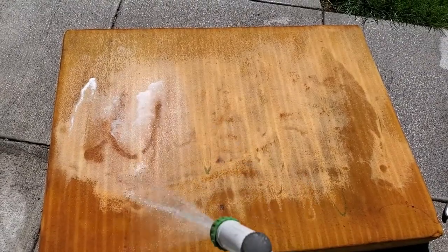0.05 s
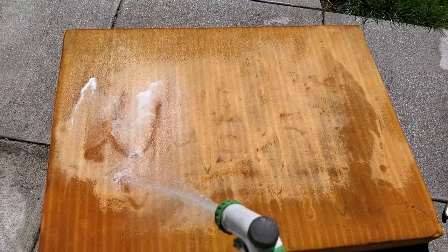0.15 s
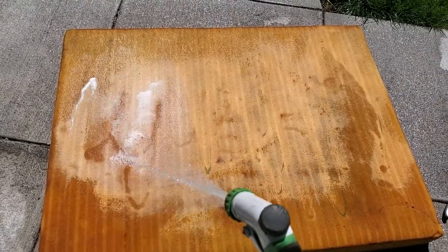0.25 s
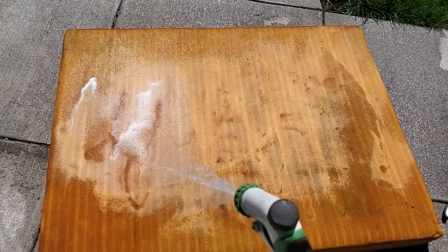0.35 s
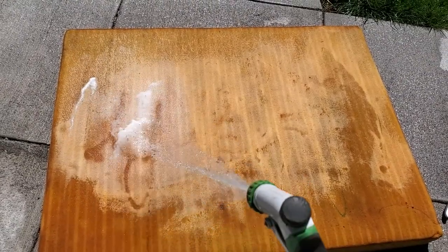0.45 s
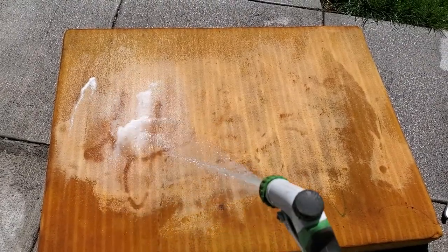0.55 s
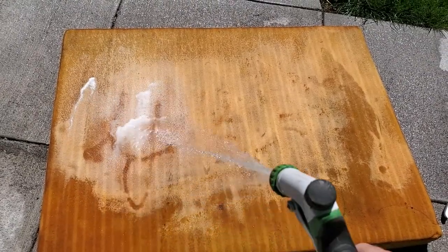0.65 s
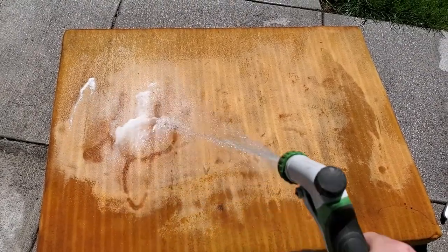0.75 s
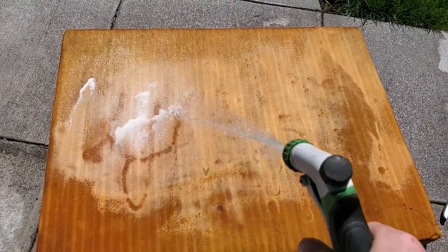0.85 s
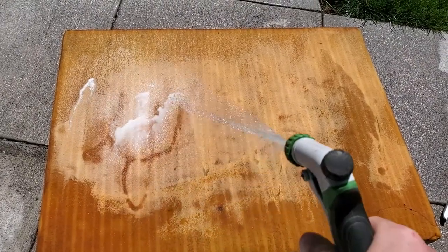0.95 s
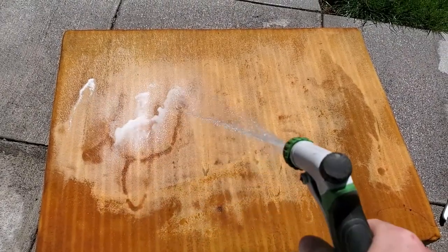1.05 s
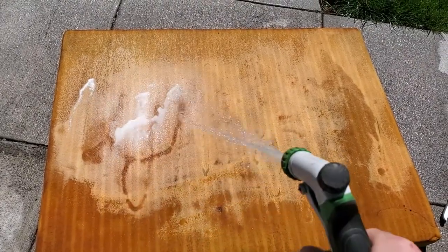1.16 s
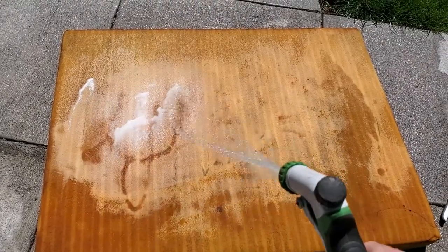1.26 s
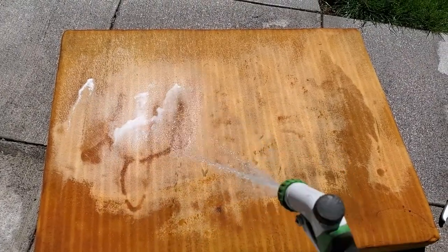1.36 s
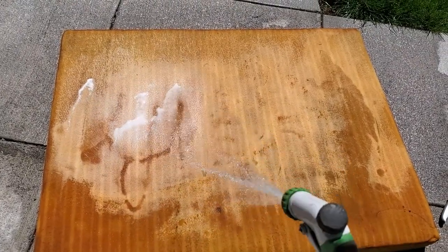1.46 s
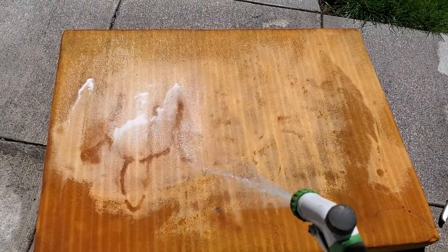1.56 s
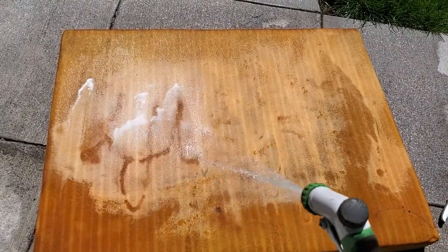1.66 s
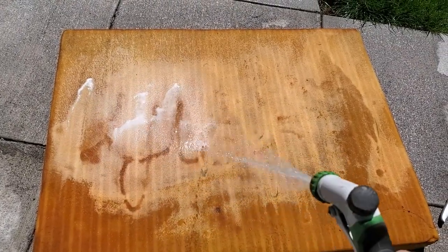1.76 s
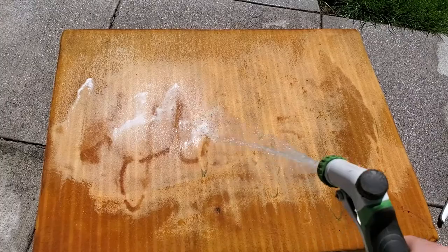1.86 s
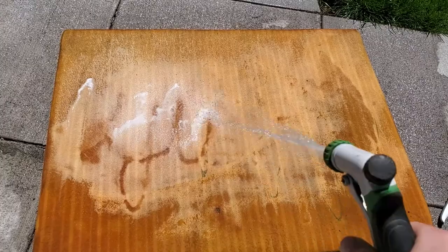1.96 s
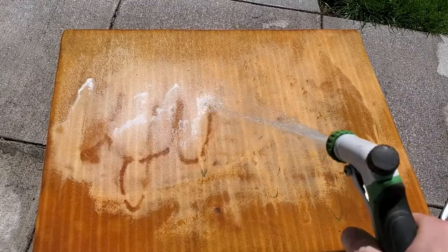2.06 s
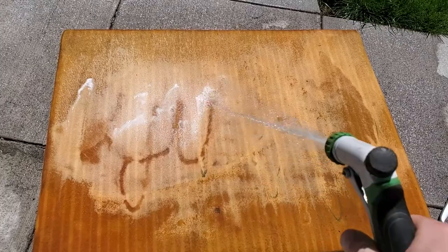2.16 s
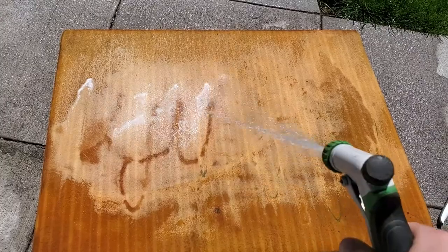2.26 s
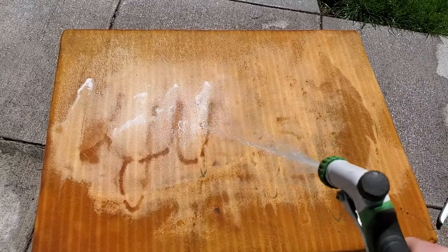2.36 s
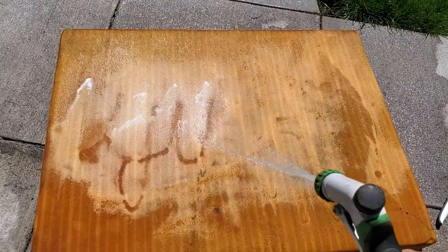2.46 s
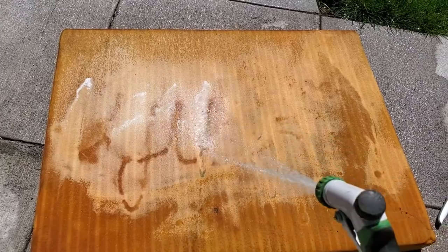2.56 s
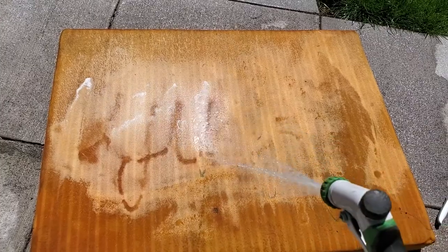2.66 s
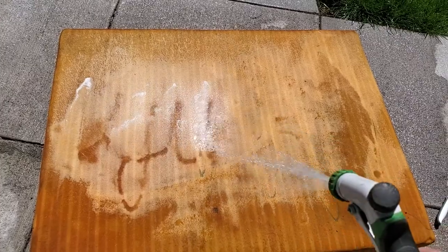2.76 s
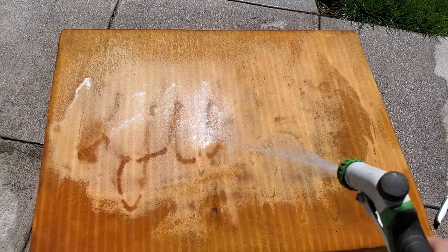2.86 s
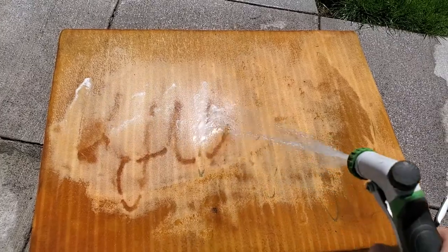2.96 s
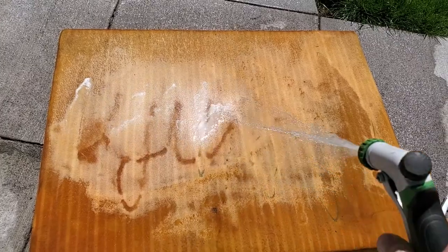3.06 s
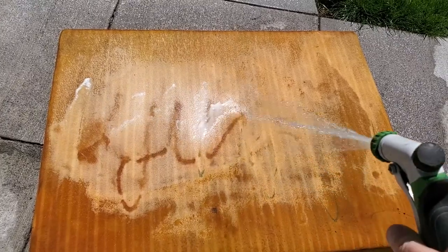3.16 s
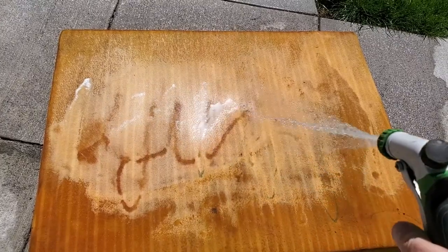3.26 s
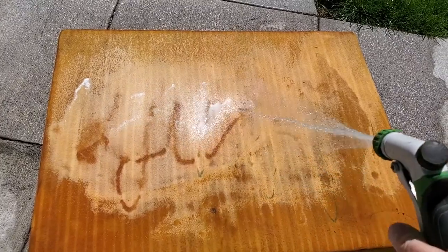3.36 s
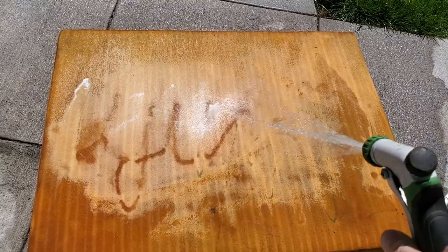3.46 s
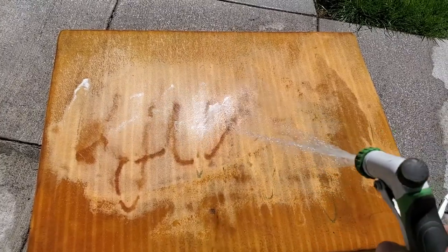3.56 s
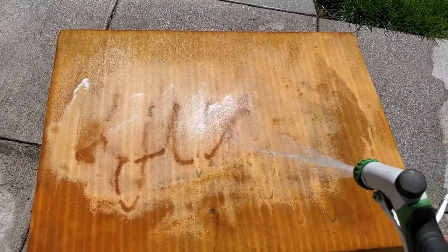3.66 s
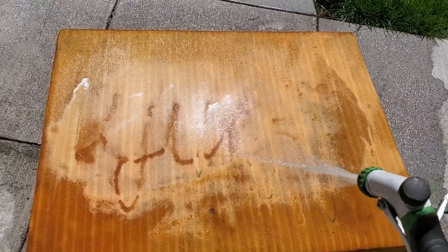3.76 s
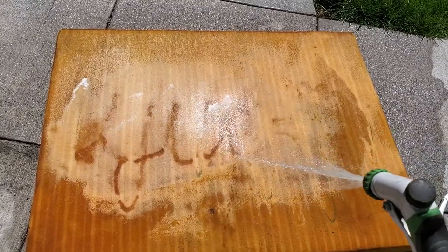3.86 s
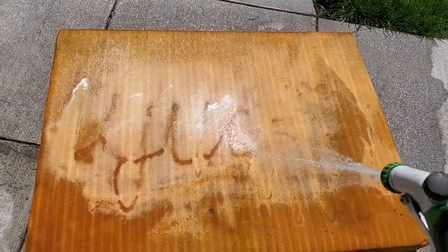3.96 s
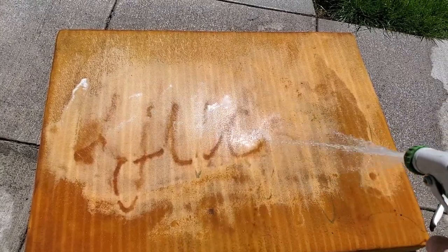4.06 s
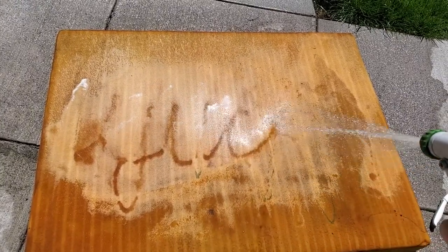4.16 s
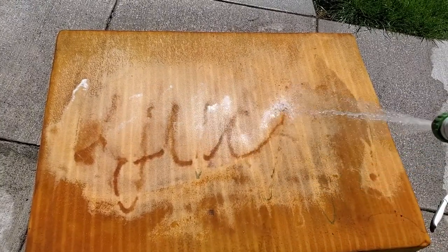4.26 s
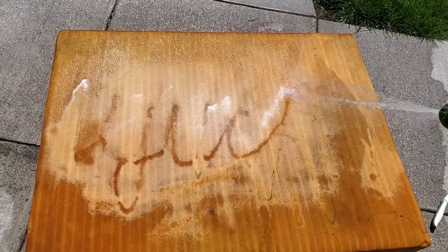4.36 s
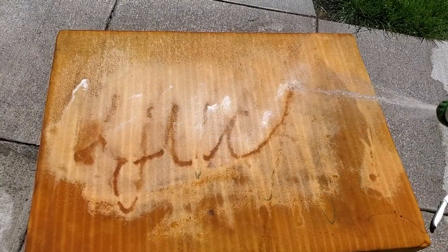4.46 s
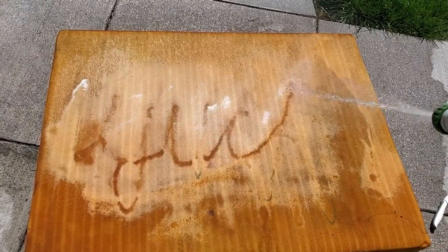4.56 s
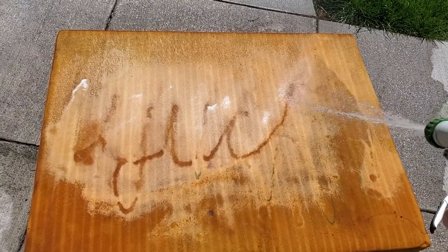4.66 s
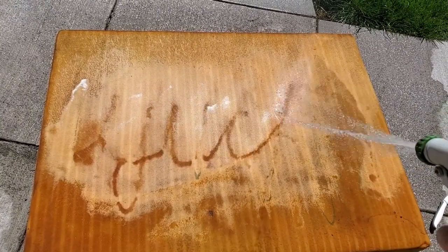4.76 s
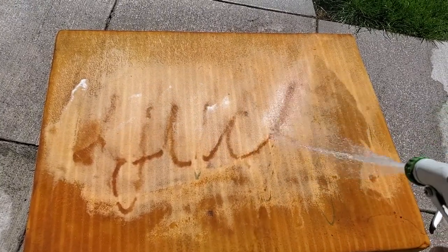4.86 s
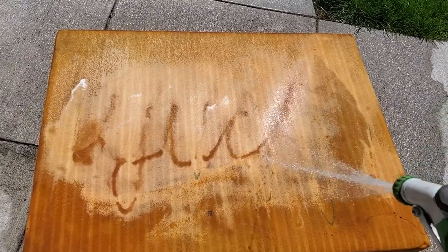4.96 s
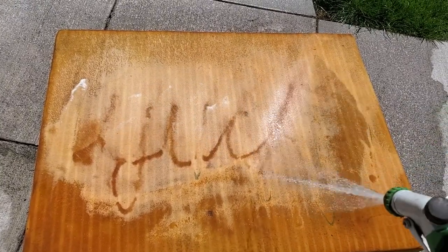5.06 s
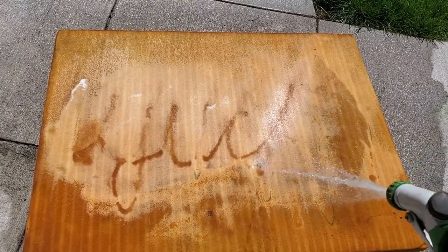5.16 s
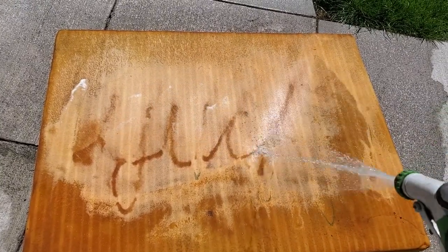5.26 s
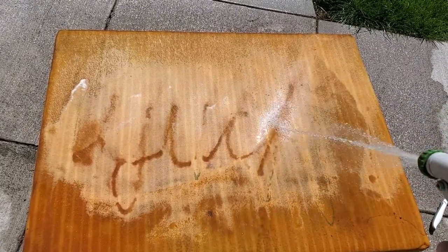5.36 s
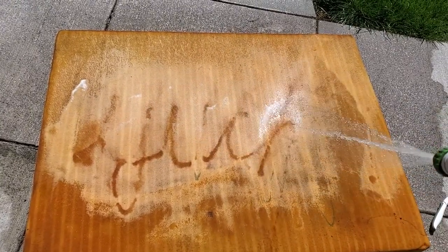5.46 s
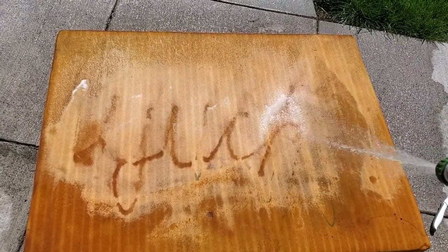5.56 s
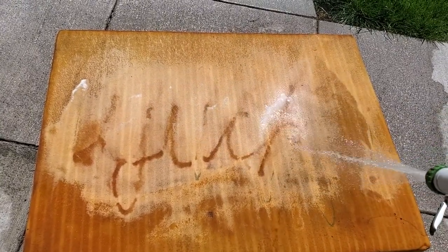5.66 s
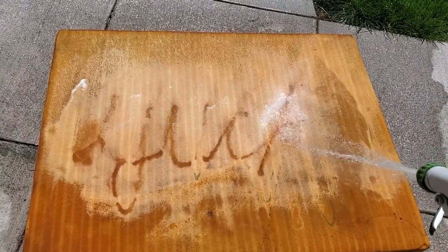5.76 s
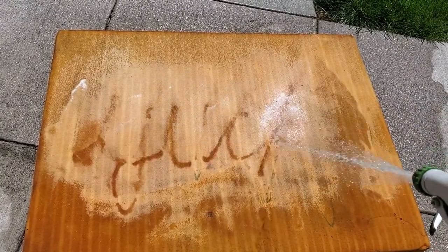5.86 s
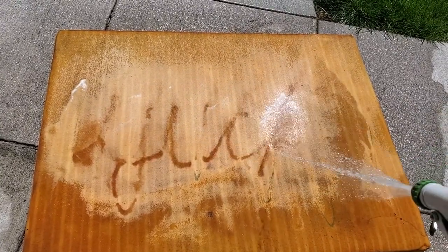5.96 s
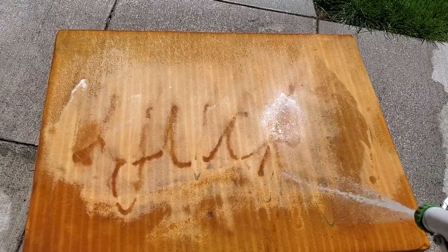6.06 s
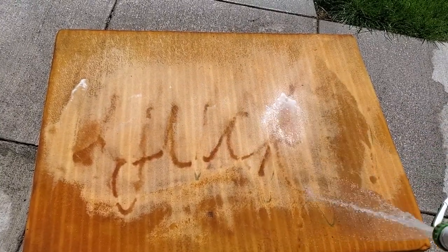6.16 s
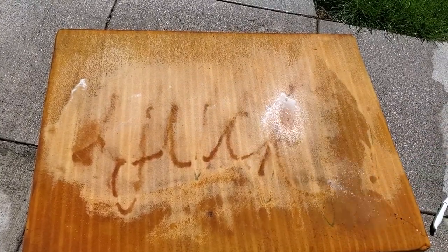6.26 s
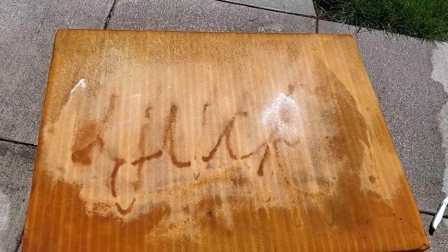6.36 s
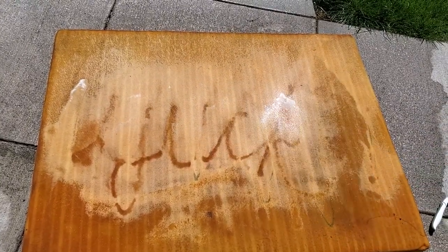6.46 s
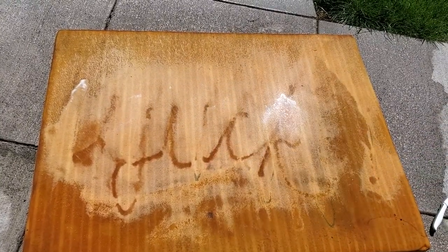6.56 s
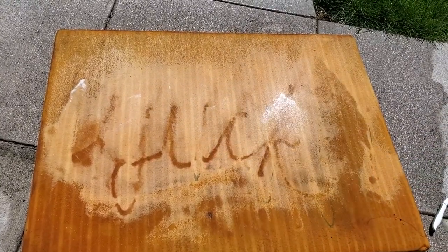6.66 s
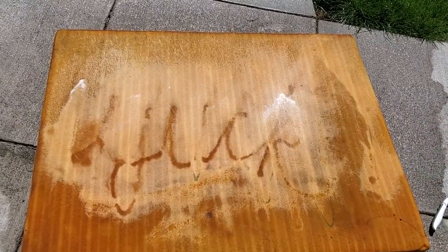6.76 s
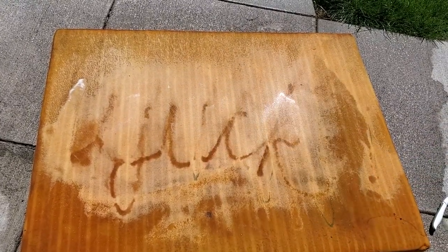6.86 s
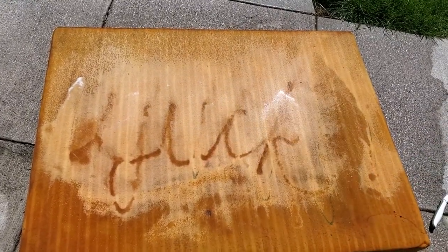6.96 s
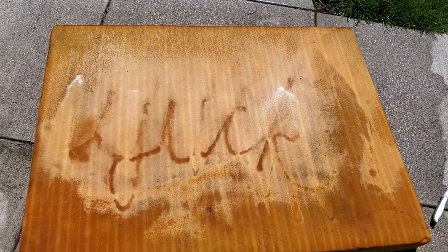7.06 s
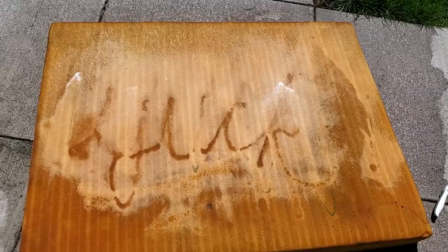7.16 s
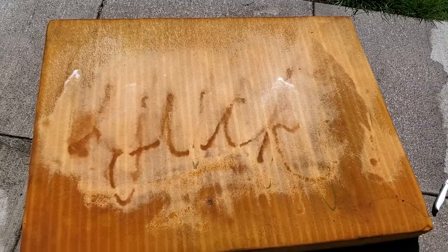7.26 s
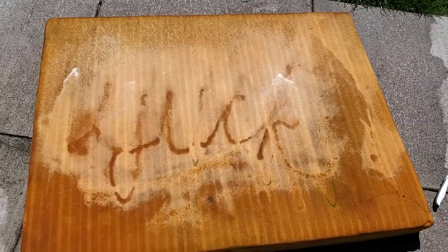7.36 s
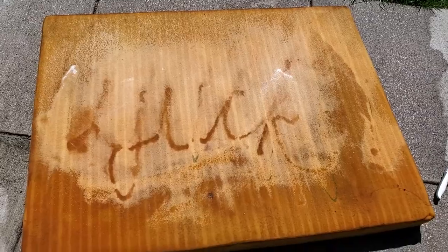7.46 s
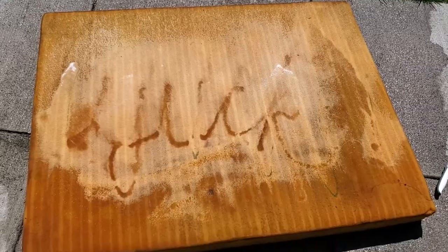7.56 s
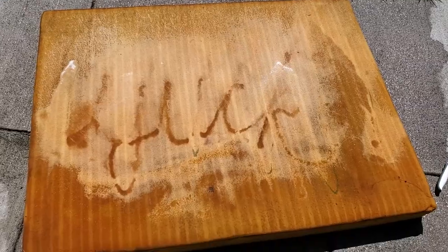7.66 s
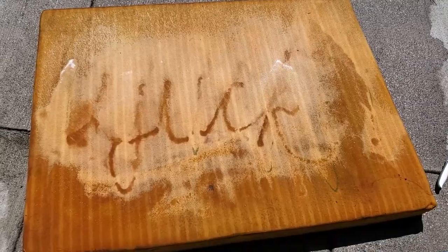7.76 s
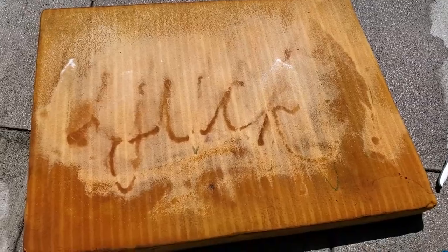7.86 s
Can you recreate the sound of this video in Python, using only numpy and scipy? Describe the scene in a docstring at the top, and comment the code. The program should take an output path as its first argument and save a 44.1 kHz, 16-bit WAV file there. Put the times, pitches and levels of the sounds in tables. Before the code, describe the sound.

A close, steady hiss of hose water drums and splashes on wet wood, its tone shifting as the jet sweeps rightward through puddles. Near the end the valve closes with a brief high squeak and the spray cuts off at once. In the quiet outdoor space that follows, water drains softly away, far engines drone and something whistles very faintly.

```python
"""A hard hose jet sweeps left to right over a wooden board outdoors; then the nozzle squeaks shut.
Countless drops burst on the wet wood, splat into puddles and trap ringing air bubbles.
Two microphone ports hear them with a moving delay and unlike colours.
Far traffic rumbles; afterwards water trickles away and something whistles thinly."""
import sys
import numpy as np
from scipy import signal
from scipy.fft import rfft, irfft, next_fast_len
from scipy.io import wavfile
from scipy.ndimage import uniform_filter1d, map_coordinates

SR = 44100
rng = np.random.default_rng(int(sys.argv[2]) if len(sys.argv) > 2 else 0)


def generate_wav(signal):
    """Clip the signal to [-1, 1] and save it as 16-bit WAV at the path in sys.argv[1]."""
    frames = np.transpose(np.atleast_2d(signal))
    scaled = np.clip(frames, -1, 1) * 32767
    pcm = np.round(scaled).astype(np.int16)
    wavfile.write(sys.argv[1], SR, pcm)


N = 348819
TIME_S = np.arange(N) / SR


def amp(db):
    return 10 ** (np.asarray(db) / 20)


def unit_rms(x):
    return x / np.sqrt(np.mean(x ** 2) + 1e-20)


def at_hz(table, hz, column=1):
    """One column, interpolated over log frequency."""
    rows = np.array(table)
    return np.interp(np.log(hz + 1), np.log(rows[:, 0] + 1), rows[:, column])


def curves(table):
    """Each column after time_s, interpolated per sample."""
    time_s, *columns = np.transpose(table)
    return [np.interp(TIME_S, time_s, column) for column in columns]


def wobble(rate_hz):
    """Smooth random curve through Gaussian knots."""
    knots = rng.standard_normal(int(N * rate_hz / SR) + 4)
    return map_coordinates(knots, [TIME_S * rate_hz])


def swell(start_s, end_s):
    """Rounded rise and fall."""
    progress = np.clip((TIME_S - start_s) / (end_s - start_s), 0, 1)
    return np.sqrt(np.sin(np.pi * progress).clip(0))


def filtered(x, response):
    """Apply a complex frequency response."""
    size = 2 * next_fast_len(N // 2 + 4096)
    return irfft(rfft(x, size) * response(np.fft.rfftfreq(size, 1 / SR)), size)[..., :N]


def highpass(hz, edge_hz, order=12):
    return 1 / (1 + (edge_hz / (hz + 1)) ** order)


def spectrum(table):
    """Zero-phase response from rows of freq_hz, gain_db."""
    return lambda hz: amp(at_hz(table, hz))


def minimum_phase(table):
    """Causal response from rows of freq_hz, gain_db."""
    def response(hz):
        cepstrum = irfft(np.log(amp(at_hz(table, hz))))
        fold = np.r_[1, 2 * np.ones(len(hz) - 2), 1, np.zeros(len(hz) - 2)]
        return np.exp(rfft(cepstrum * fold))
    return response


def resonance(hz, centre_hz, width_hz):
    return 1j * hz * width_hz / (centre_hz ** 2 - hz ** 2 + 1j * hz * width_hz)


def stereo_noise(response, coherence, patchy_db):
    """Unit-rms noise with random gain patches in time and frequency."""
    bins = signal.stft(rng.standard_normal((2, N)), nperseg=512)[2]
    patches = uniform_filter1d(rng.standard_normal(bins.shape[1:]), size=5, axis=0)
    patches = unit_rms(uniform_filter1d(patches, size=12, axis=1))
    noise = signal.istft(bins * amp(patchy_db * patches), nperseg=512)[1][:, :N]
    mid, side = filtered(noise, response)
    angle = np.arccos(coherence) / 2
    mid, side = np.cos(angle) * mid, np.sin(angle) * side
    return unit_rms(np.array([mid + side, mid - side]))


def noise_band(start_s, end_s, centre_hz, width_hz, level_db, coherence):
    """Band of noise that swells and fades."""
    band = stereo_noise(lambda hz: resonance(hz, centre_hz, width_hz) ** 2, coherence, patchy_db=3)
    return amp(level_db) * swell(start_s, end_s) * band


def wavering_tone(pitch_hz, waver_hz, flicker_db):
    """Sine with unsteady pitch and level, rms near 1."""
    gain = np.sqrt(2) * amp(flicker_db * wobble(7.8))
    cycles = rng.random() + np.cumsum(pitch_hz + waver_hz * wobble(25)) / SR
    return gain * np.sin(2 * np.pi * cycles)


# freq_hz, gain_db
AIR_SPECTRUM = [(5000, -20.5), (8000, 1.5), (11500, 6), (12500, -14.5), (16000, -24)]
def air():
    """Faint high hiss."""
    return amp(-91.5) * stereo_noise(spectrum(AIR_SPECTRUM), coherence=.1, patchy_db=1)


# start_s, end_s, pitch_hz, waver_hz, level_db
FAR_TONES = [(6.6, 6.88, 2495, 35, -82), (6.37, 6.6, 2830, 90, -83), (6.35, 6.56, 542, 6, -74),
             (6.55, 6.95, 585, 8, -78), (6.86, 7.6, 537, 3, -75), (7.1, 7.24, 648, 6, -72),
             (7.65, 8.1, 608, 6, -69), (7.62, 7.8, 525, 8, -72), (7.25, 7.55, 716, 4, -76),
             (7.15, 7.48, 476, 4, -75), (7.02, 7.32, 350, 4, -74), (7.05, 7.5, 233, 3, -71),
             (6.98, 7.35, 118, 2, -60), (6.35, 6.75, 116, 2, -58)]
def far_tones():
    """Faint distant tones come and go."""
    return sum(amp(level_db) * swell(start_s, end_s) * wavering_tone(pitch_hz, waver_hz, flicker_db=4.5)
               for start_s, end_s, pitch_hz, waver_hz, level_db in FAR_TONES)


# freq_hz, gain_db
STREET_SPECTRUM = [(100, -30), (170, -1.5), (438, -6.5), (615, -5), (675, -5.5), (1150, -15), (1600, -44.5),
                   (2080, -52.5), (3520, -120)]
# time_s, level_db
STREET_LEVEL = [(0, -66.5), (6.5, -64), (7, -66), (7.91, -59)]
def street_rush():
    """Dull rush of far traffic."""
    rush = stereo_noise(spectrum(STREET_SPECTRUM), coherence=.7, patchy_db=.2)
    return amp(curves(STREET_LEVEL)[0]) * rush


# centre_hz, width_hz, gain_db
ENGINE_BANDS = [(50, 8.8, -8), (84, 22, -6.5), (115.05, 9.8, -5.5), (149.33, 18, -14)]
# time_s, level_db
DRONE_LEVEL = [(0, -56.5), (.8, -53), (1.5, -53), (2.2, -50.5), (2.6, -45.5), (2.8, -53), (3.4, -48),
               (4.1, -52.5), (4.8, -50.5), (6.3, -54.5), (7.45, -56), (7.65, -51), (7.91, -54.5)]
def far_engines():
    """Far engines drone in a few low bands."""
    def response(hz):
        bands = sum((-1) ** k * amp(gain_db) * resonance(hz, centre_hz, width_hz)
                    for k, (centre_hz, width_hz, gain_db) in enumerate(ENGINE_BANDS))
        return bands * (hz < 220) * highpass(hz, 34, order=5)
    drone = stereo_noise(response, coherence=.88, patchy_db=.5)
    return amp(curves(DRONE_LEVEL)[0] + 1.4 * wobble(5.4)) * drone


def passing_engine():
    """One engine draws near and leaves."""
    return noise_band(start_s=5, end_s=6, centre_hz=154.5, width_hz=18, level_db=-56.5, coherence=1)


# time_s, pitch_hz, relative_db
IDLE_TRACK = [(0, 76, -56.5), (0.31, 76.1, -52), (1.19, 76.1, -49.5), (1.43, 77, -56), (2.6, 77.4, -47),
              (2.77, 76.2, -53), (3.81, 75.8, -50), (4.36, 77, -47.5), (5.22, 75, -52.5), (6.5, 75.9, -52),
              (7.3, 76.4, -58.5), (7.65, 76.7, -50), (7.91, 76.2, -50.5)]
# pitch_multiple, gain_db
IDLE_ORDERS = [(1, 0.5), (1.5, -14.5)]
def idling_engine():
    """Low orders of the nearest engine, slightly unsteady."""
    pitch_hz, relative_db = curves(IDLE_TRACK)
    orders = sum(amp(gain_db) * wavering_tone(multiple * pitch_hz, waver_hz=1.6, flicker_db=2)
                 for multiple, gain_db in IDLE_ORDERS)
    return amp(relative_db - 2.5) * orders


# harmonic, peak_s, level_db, fade_db_per_s
WHISTLE_SWELLS = [(1, 7.06, -85, 70), (1, 7.35, -77, 60), (1, 7.75, -85, 5), (2, 7.065, -81, 130),
                  (2, 7.39, -88, 30), (2, 7.71, -90, 60)]
def whistle(start_s=6.88, first_hz=2940, last_hz=3245, glide_s=.19, rise_s=.073):
    """A thin wavering tone and its octave glide up and settle."""
    age_s = (TIME_S - start_s).clip(0)
    pitch_hz = last_hz + (first_hz - last_hz) * np.exp(-age_s / glide_s)
    phase = 2 * np.pi * np.cumsum(pitch_hz * (1 + .0035 * wobble(120))) / SR
    tone = 0
    for harmonic, peak_s, level_db, fade_db_per_s in WHISTLE_SWELLS:
        swell_db = level_db - fade_db_per_s * np.abs(TIME_S - peak_s) + 1.5 * wobble(10)
        tone += amp(swell_db) * np.sin(harmonic * phase)
    onset = 1 - np.exp(-age_s / rise_s)
    return onset * amp(3.8 * wobble(30)) * tone


# time_s, gurgle_db, fizz_db
TRICKLE_LEVELS = [(6.2, -68.5, -89), (6.45, -72, -80), (6.68, -76.5, -90), (6.85, -70.5, -88.5),
                  (7.39, -71.5, -82), (7.42, -64, -79), (7.7, -65.5, -80.5), (7.91, -67, -87.5)]
# freq_hz, gain_db
GURGLE_SPECTRUM = [(760, -29), (1300, 2), (1660, -1), (2500, 0), (2850, -5.5), (3270, -6), (4300, -14.5),
                   (5590, -52.5), (9460, -120)]
FIZZ_SPECTRUM = [(3300, -25), (4300, -10.5), (5100, -8.5), (6500, -11.5), (7200, -19.5), (9000, -38.5),
                 (20000, -89.5)]
# start_s, end_s, centre_hz, width_hz, level_db
HISSES = [(6.36, 6.66, 2850, 260, -77), (6.48, 6.58, 2430, 200, -75.5), (6.43, 6.57, 5100, 450, -81),
          (6.82, 6.95, 3000, 700, -78), (7.4, 7.5, 3300, 900, -77), (7.5, 7.68, 2500, 120, -79),
          (7.05, 7.16, 11500, 5000, -87)]
def run_off():
    """Water drains off the board: gurgle leaning left, fizz leaning right, brief hisses."""
    gurgle_db, fizz_db = curves(TRICKLE_LEVELS)
    pan_db = np.array([[1.5], [-1.5]])
    gurgle = stereo_noise(spectrum(GURGLE_SPECTRUM), coherence=-.33, patchy_db=2)
    fizz = stereo_noise(spectrum(FIZZ_SPECTRUM), coherence=.2, patchy_db=3)
    hisses = sum(noise_band(*row, coherence=.8) for row in HISSES)
    return amp(gurgle_db + pan_db) * gurgle + amp(fizz_db - pan_db) * fizz + hisses


# freq_hz, t60_s
YARD_DECAY = [(200, .2), (2500, .22), (6000, .17), (13000, .19)]
def yard_reverb(x):
    """Reflections from the surroundings; each frequency dies at its own rate."""
    hz, age_s, bins = signal.stft(rng.standard_normal((2, SR // 3)), SR, nperseg=256)
    decay = amp(-60 * age_s / at_hz(YARD_DECAY, hz)[:, None])
    tail = signal.istft(bins * decay, SR, nperseg=256)[1]
    return signal.fftconvolve(x, tail / np.linalg.norm(tail[0]), axes=1)[:, :N]


SHUT_S, SHUT_FALL_S = 6.282, .003
def valve_squeak(peak_s=6.252, centre_hz=4900, width_hz=600, rise_t60_s=.022, fall_t60_s=.09):
    """The last water squeezes through the closing valve."""
    age_s = TIME_S - peak_s
    t60_s = np.where(age_s > 0, fall_t60_s, rise_t60_s)
    envelope = amp(-60 * np.abs(age_s) / t60_s) * (TIME_S < SHUT_S)
    band = stereo_noise(lambda hz: resonance(hz, centre_hz, width_hz) ** 2, coherence=.8, patchy_db=1)
    return amp([[-31], [-25]]) * envelope * band


def bubbles(start_s, centre_hz, log_spread, cycles, level_db=0):
    """Air trapped under the drops rings for a few cycles, rising a little in pitch."""
    pitch_hz = centre_hz * np.exp(log_spread * rng.standard_normal(len(start_s)))
    size_db = 2.38 * rng.exponential(size=len(start_s)).clip(0, 4)
    offsets = np.arange(384)
    turns = pitch_hz[:, None] * offsets / SR
    envelope = amp(level_db + size_db)[:, None] * turns * np.exp(-3 * turns / cycles)
    rings = envelope * np.sin(2 * np.pi * turns * (1 + .089 * turns / cycles))
    samples = (start_s * SR).clip(0, N).astype(int)[:, None] + offsets
    return np.bincount(samples.ravel(), rings.ravel(), N)[:N]


# peak_s, pitch_hz, bubble_db
FROTH_BURSTS = [(0.03, 2300, -46.5), (0.12, 900, -58.5), (0.22, 1960, -43.5), (0.3, 1945, -53.5),
                (0.6, 1930, -51.5), (0.72, 2054, -47.5), (0.74, 2500, -53), (0.82, 1870, -52),
                (0.92, 1780, -50), (1.5, 2243, -50), (1.74, 1980, -48), (1.94, 2084, -44),
                (2.09, 2100, -48), (2.42, 900, -57), (2.52, 1900, -50.5), (2.79, 2040, -45.5),
                (2.96, 1435, -56), (3.03, 2030, -45), (3.17, 2220, -54), (3.3, 1930, -48.5),
                (3.43, 1844, -55), (3.55, 1990, -51), (3.85, 1934, -47), (3.96, 850, -57.5),
                (4.06, 1500, -53.5), (4.15, 1350, -52.5), (4.18, 860, -57.5), (4.3, 1430, -51.5),
                (4.49, 1760, -57.5), (4.72, 1450, -53), (4.86, 836, -57.5), (4.98, 2120, -47.5),
                (5.07, 1893, -47), (5.24, 1600, -49.5), (5.3, 849, -57.5), (5.47, 1411, -45.5),
                (5.55, 851, -60), (5.72, 1980, -50), (5.78, 1956, -51), (5.88, 1460, -51),
                (6.0, 1580, -52.5), (6.11, 2263, -47), (6.24, 2120, -52.5)]
def froth_bursts(bubbles_each=90, rise_s=.02, fall_s=.05):
    """The jet churns lying water: bubble crowds near one pitch gather fast and thin out."""
    peak_s, pitch_hz, bubble_db = np.repeat(FROTH_BURSTS, bubbles_each, axis=0).T
    early, late = rng.exponential(size=(len(peak_s), 2)).T
    start_s = peak_s - rise_s * early + fall_s * late
    return bubbles(start_s, pitch_hz, log_spread=.09, cycles=9.35, level_db=bubble_db)


# peak_s, swell_db
SPLATS = [(0.09, 0), (0.22, 2), (0.92, 2.5), (1.95, 2.5), (2.37, 3.5), (2.86, 2), (3.08, 0.5), (3.84, -1),
          (4.05, 4), (4.29, 9.5), (4.69, 4), (5.451, 7), (5.99, -4.5)]
def splat_swell_db(rise_s=.018, fall_s=.066):
    """Plunges into puddles: a control curve that swells fast and sinks slowly."""
    peak_s, swell_db = np.transpose(SPLATS)
    age_s = TIME_S - peak_s[:, None]
    return swell_db @ np.exp(-np.abs(age_s) / np.where(age_s < 0, rise_s, fall_s))


def drops(rate_hz=3500, spread_db=3.1, hiss_gain=.7):
    """Impacts of scattered size, the hiss of the finest drops, and bubbles."""
    landing = rng.random(N) < rate_hz / SR
    size_db = spread_db * rng.exponential(size=N).clip(0, 3.5)  # no drop outgrows the nozzle
    impacts = landing * amp(size_db) * rng.standard_normal(N).clip(-2, 2)
    froth = bubbles(rng.random(6000) * N / SR, centre_hz=2630, log_spread=.4924, cycles=8.3)
    return unit_rms(impacts) + hiss_gain * rng.standard_normal(N) + amp(-12) * unit_rms(froth)


# freq_hz, gain_db
BURST_SPECTRUM = [(25, -27), (120, -12), (330, -8.5), (560, -13), (850, -6), (1100, -6.5), (1450, 0),
                  (2000, 0), (2350, -3.5), (3700, 0), (6800, -3.5), (8000, -13), (9200, -6.5), (11500, 0),
                  (13300, -5), (15500, -4)]
def drop_trains():
    """Two trains of bursting drops share the jet's flutter; normalised on the mid band."""
    flutter = amp(.21 * wobble(250) + .19 * wobble(700))
    trains = filtered(flutter * np.array([drops(), drops()]), minimum_phase(BURST_SPECTRUM))
    return trains / np.std(filtered(trains[0], lambda hz: (hz > 1750) & (hz < 3300)))


# time_s, water_depth (-1 bare wood, 0 film, 1 puddle, 2 deep), force_db
LANDING = [(0.0, -0.11, 6), (0.16, 0.8, 0.5), (0.24, 0.8, 0.5), (0.34, 1.5, 0), (0.44, 1.5, 0.5),
           (0.5, 0.5, 0), (0.61, 0, -1.5), (0.67, 2, -1), (0.72, -0.33, 2), (0.92, 0.16, -1),
           (1.02, 1.4, -4.5), (1.26, 0.9, -2.5), (1.34, 1.3, 0.02), (1.68, 0.31, 1), (1.84, 1.21, 3),
           (1.94, 0.7, 1.5), (2.06, -0.5, 0), (2.2, 0.8, -2.5), (2.38, 1.5, -0.7), (2.46, 1.5, 0.07),
           (2.6, 0.7, 1.5), (2.66, 0.9, 0.5), (2.86, 1.16, -0.38), (3.02, -0.5, 1.2), (3.1, 1.03, 0.7),
           (3.18, -0.8, -0.2), (3.26, 1.5, -5), (3.42, 0.6, -0.96), (3.5, 1.34, -2.5), (3.74, 0.6, 0.25),
           (3.96, 1.23, 3.5), (4.1, 1.5, 4.5), (4.16, 4, 4), (4.38, 0.92, 2), (4.44, 1, 0), (4.5, 0, -2.5),
           (4.62, 1.3, -3), (4.8, 2.5, -0.5), (4.92, 0.42, -2.5), (5.0, 1.15, -1.4), (5.24, 0.5, 3.5),
           (5.36, 3.5, 4.5), (5.46, 1.5, 0.3), (5.66, 0.5, -1.4), (5.78, 0.3, 1.5), (5.86, 2.1, -1.5),
           (6.0, 0.5, 1.18), (6.14, 0.5, -3.2), (6.22, -1.02, 3.5)]
# edge_hz between boom, drumming, pool, splash, spatter, mist
BAND_EDGES_HZ = [580, 1180, 1750, 3400, 7800]
# per band: gain_db, force_weight, fine_weight, splat_weight, best_depth, boost_db, depth_width
BANDS = [(-39, -0.55, 1.05, 0, -0.74, 3.5, 1), (-49.5, 1, 0, -1, 1.936, 15, 1),
         (-51, 0.5, -0.5, 1.5, 0.62, 12, 0.87), (-43.5, 0.95, -0.5, -0.13, -0.058, 6, 0.65),
         (-40, -0.05, 1.0862, -0.05, 0, -0.5, 1), (-39.5, -0.02, 1, 0, 0.19, 0.5, 1)]
def wet_board(fine_db):
    """Drops on the board, coloured by force, fine spray, splats and water depth, plus froth."""
    depth, force_db = curves(LANDING)
    trains, splat_db = drop_trains(), splat_swell_db()
    edges_hz = [0, *BAND_EDGES_HZ, SR]
    spray = 0
    for band, low_hz, high_hz in zip(BANDS, edges_hz, edges_hz[1:]):
        gain_db, force_weight, fine_weight, splat_weight, best_depth, boost_db, depth_width = band
        drive_db = force_weight * force_db + fine_weight * fine_db + splat_weight * splat_db
        depth_db = boost_db * np.exp(-.5 * ((depth - best_depth) / depth_width) ** 2)
        in_band = filtered(trains, lambda hz: highpass(hz, low_hz) - highpass(hz, high_hz))
        spray += amp(gain_db + drive_db + depth_db + wobble(12)) * in_band
    return spray + np.array([froth_bursts(), froth_bursts()])


# jet aim: time_s, left_lag_us
AIM = [(0.0, -85.5), (0.18, -82), (0.36, -65.5), (0.56, -37.5), (0.74, -27), (0.96, -20.5), (1.2, -22),
       (1.42, -33.5), (1.6, -21.5), (1.8, 0.0), (2.0, 8.5), (2.18, 9), (2.34, -3), (2.57, -8.5), (2.85, 10),
       (3.22, 52.5), (3.45, 33.5), (3.6, 19), (3.84, 29.5), (4.0, 57), (4.16, 81), (4.3, 96), (4.46, 106.5),
       (4.64, 108.5), (4.84, 76.5), (5.07, 50.5), (5.2, 61.5), (5.3, 75), (5.46, 102), (5.57, 109.5),
       (5.76, 82), (5.92, 70.5), (6.08, 79.5), (6.24, 128.5)]
# four jet positions, left to right: left_lag_us
POSITION_LAGS_US = (-80, -10, 60, 108)
# left port against right, per position: freq_hz, 4 x gain_db, 4 x lead_rad, 4 x coherence
PORT_RESPONSE = [(170.0, -1, 0.5, 0.5, -0.5, 0.1, -0.1, 0, 0.1, 1.0, 1, 1.0, 0.994),
                 (520.0, 2, 0.5, 1, 0.5, 0, 0.62, 0.6, 0.77, 0.868, 0.93, 1, 1),
                 (1034, 3, 3, 3.5, 6, 0.9, 0.83, 1.09, 1, 0.93, 0.94, 0.94, 0.932),
                 (1620, 6.5, 7.5, 8.5, 6, 1.0, 0.96, -0.43, 0.96, 0.94, 0.99, 1.0, 0.907),
                 (2220, 11.5, 12.5, 11.5, 11.5, -0.6, 0.8, 1.9, 0.5, 0.86, 0.91, 0.88, 0.83),
                 (2750, 11.5, 10, 9.5, 9.5, 0.5, -0.4, 0, -0.47, 0.97, 0.86, 0.87, 0.94),
                 (3375, 1, 4.5, 6.5, 4.5, -0.3, 0.27, -1.5, -0.15, 0.9, 0.9, 0.94, 0.89),
                 (3450, 3, -0.5, 0, -1.5, 0.5, -0.5, -0.4, -1.14, 0.63, 1, 0.9, 0.9),
                 (3740, 2.5, 1.5, 0, 2, 0.03, -0.19, 0.5, 0.16, 0.78, 0.76, 0.88, 0.79),
                 (4000, 0, 3.5, 0, 0.5, 0.92, 0.7, 0.8, -0.08, 0.87, 0.77, 0.82, 0.95),
                 (4480, 3.5, 1.5, 2, -0.5, 0.5, -0.2, 0, 0.01, 0.89, 1, 0.75, 0.99),
                 (4870, 3.5, -0.5, 2.5, -0.5, 0, -0.5, -0.9, -0.18, 0.9, 0.74, 0.85, 0.82),
                 (5150, 3.5, -1.5, 0.5, -3, 0.68, -0.1, -0.65, -0.62, 0.81, 0.75, 0.968, 0.85),
                 (5680.0, 1, -3, -3.5, -9, 0.5, 1.08, -0.71, 0, 0.85, 0.54, 0.85, 0.45),
                 (6250, 1.5, -5, -5.5, -9, 0.8, -0.5, -0.14, -3, 1, 0.72, 0.7, 0.45),
                 (6738, 3, -8, -9.5, -9.5, -0.2, 1.55, -1, -0.5, 0.94, 0.49, 0.35, 0.27),
                 (7410.0, -2, -6.5, -8, -7, 0.1, 1, -1.5, -3.5, 0.8, 0.34, 0.22, 0.35),
                 (8010, -2.5, -1.5, -1, 0.5, 0.5, 0, -4.7, 0, 0.92, 0.43, 0.65, 0.57),
                 (8580, -3, 0, 3.5, 5.5, -2.7, -2.5, -2, -2.5, 0.61, 0.59, 0.75, 0.72),
                 (9598, -0.5, 3, 5.5, 6.5, -3, -3.5, -2.5, -3, 0.65, 0.65, 0.83, 0.733),
                 (10680.0, -1.5, 0.5, 0.5, 0, -4, -2.9, -3, -2.5, 0.64, 0.64, 0.96, 0.85),
                 (11710.0, -5.5, -0.5, -2, -1.5, -5, -3, -2, -2.5, 0.09, 0.77, 0.79, 0.75),
                 (12750.0, 2, 2.5, 2.5, 1.5, -9, -2, -1.5, -2.1, 0.5, 0.73, 0.83, 0.72),
                 (13560, 5.5, 2.5, 5.5, 4.5, -9.5, -2.5, -2, -1.28, 0.73, 0.65, 0.71, 0.64),
                 (15330.0, 3.5, -0.5, -1, 1, -9.5, -1.5, -2.5, -1.28, 0.68, 0.5, 0.64, 0.49)]
def left_port(right_train, second_train):
    """Delay and colour follow the jet's aim; a second, unrelated train of drops makes the ports less alike."""
    lag_us, = curves(AIM)
    oversampled = signal.resample(np.pad(right_train, (0, 4096)), 4 * (N + 4096))
    delayed = map_coordinates(oversampled, [4 * (TIME_S - lag_us / 1e6) * SR], order=1, mode="nearest")
    left = 0
    for position in range(4):
        share = np.interp(lag_us, POSITION_LAGS_US, np.eye(4)[position])
        gain = lambda hz: amp(at_hz(PORT_RESPONSE, hz, column=1 + position))
        lead = lambda hz: np.exp(1j * at_hz(PORT_RESPONSE, hz, column=5 + position))
        coherence = lambda hz: at_hz(PORT_RESPONSE, hz, column=9 + position).clip(0, 1)
        left += share * filtered(delayed, lambda hz: gain(hz) * coherence(hz) * lead(hz))
        left += share * filtered(second_train, lambda hz: gain(hz) * np.sqrt(1 - coherence(hz) ** 2))
    return left


# break-up into fine spray: time_s, fine_db
FINE_SPRAY = [(0.0, 2.5), (0.28, 0.01), (0.72, 0), (1.18, -3.5), (1.6, 1), (1.86, 1), (2.32, -2.0),
              (2.7, 1.45), (2.98, -0.5), (3.08, 0.5), (3.24, -0.5), (3.52, -1.7), (3.96, 2.5), (4.3, 0.8),
              (4.42, 0.5), (4.55, -1.5), (4.68, -2), (4.8, -1.5), (5.04, 0.7), (5.2, 3.0), (5.58, -0.2),
              (5.76, 1.5), (5.98, 0), (6.22, 3)]
def hose_jet(left_mist_weight=.93):
    """The jet hits the board until the nozzle shuts; the left port faces the mist."""
    fine_db, = curves(FINE_SPRAY)
    flow = 1 / (1 + np.exp(np.clip((TIME_S - SHUT_S) / SHUT_FALL_S, -50, 50)))
    right_train, second_train = flow * wet_board(fine_db)
    left = left_port(right_train, second_train)
    mist = filtered(left, lambda hz: highpass(hz, BAND_EDGES_HZ[-1]))
    left += (amp(left_mist_weight * fine_db) - 1) * mist
    return np.array([left, right_train])


def scene():
    hose = hose_jet() + valve_squeak()
    reflections = amp(-19.5) * yard_reverb(hose)
    traffic = far_engines() + street_rush() + idling_engine() + passing_engine()
    return hose + reflections + traffic + air() + far_tones() + run_off() + whistle()


def record(dry):
    """Steep treble cut-off."""
    top_hz, taper_hz = 15900, 200
    return filtered(dry, lambda hz: np.sin(np.pi / 2 * np.clip((top_hz - hz) / taper_hz, 0, 1)) ** 2)


dry = scene()
out = record(dry)
generate_wav(out)
```